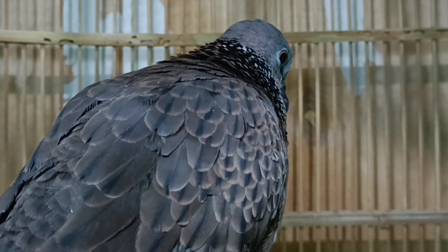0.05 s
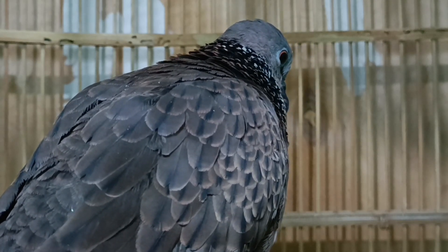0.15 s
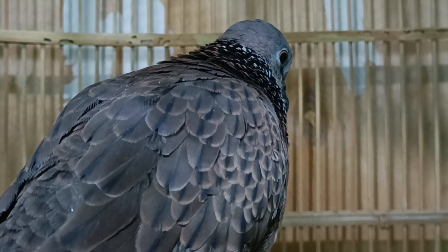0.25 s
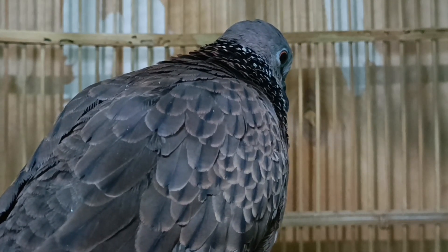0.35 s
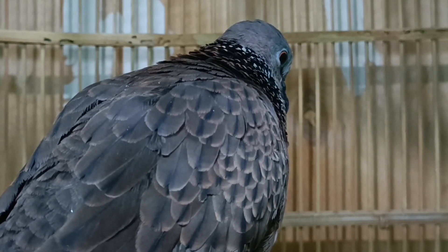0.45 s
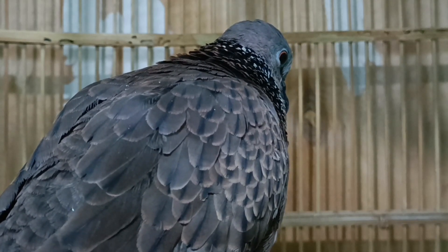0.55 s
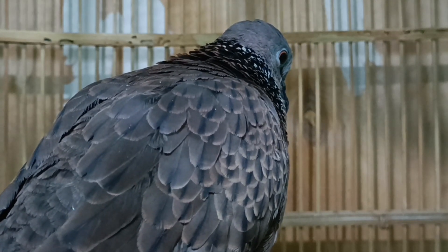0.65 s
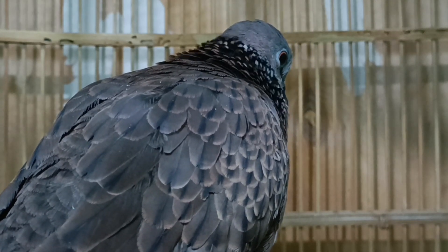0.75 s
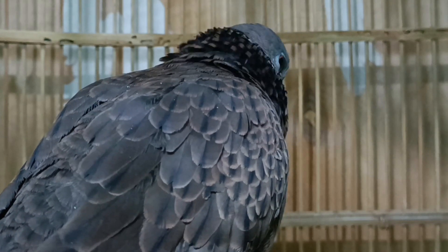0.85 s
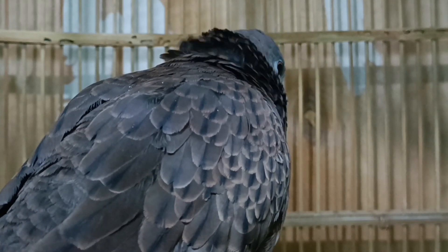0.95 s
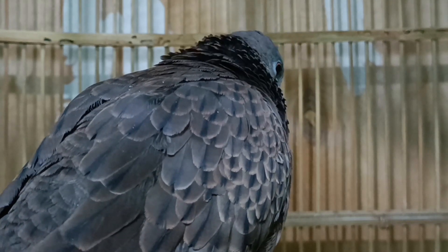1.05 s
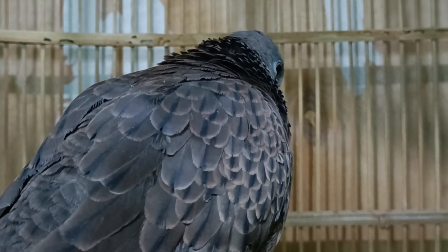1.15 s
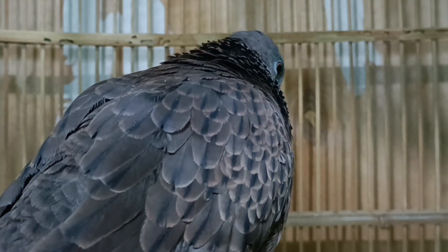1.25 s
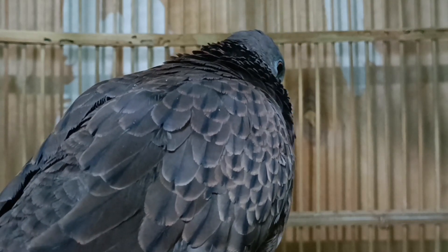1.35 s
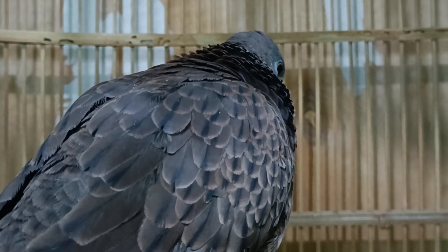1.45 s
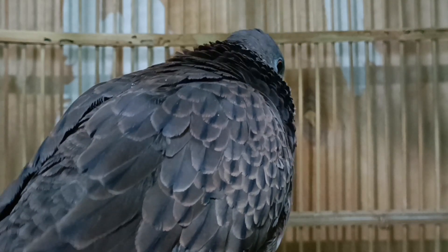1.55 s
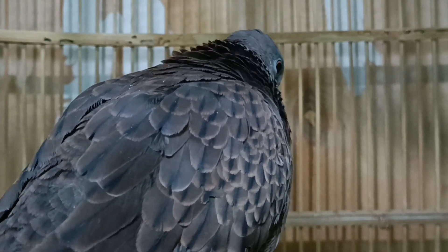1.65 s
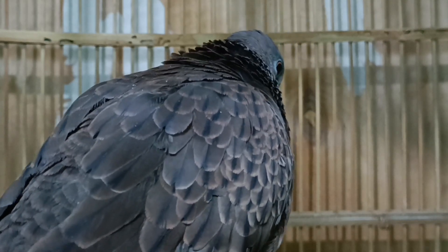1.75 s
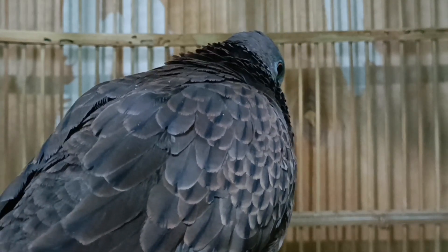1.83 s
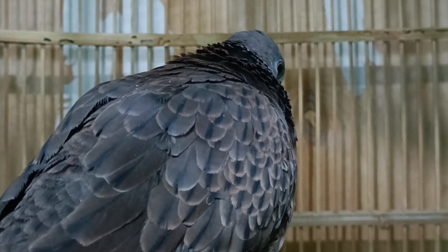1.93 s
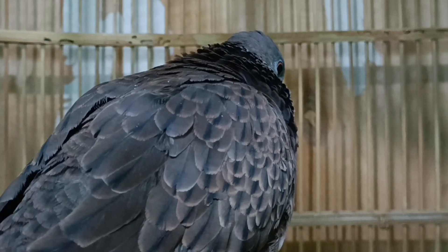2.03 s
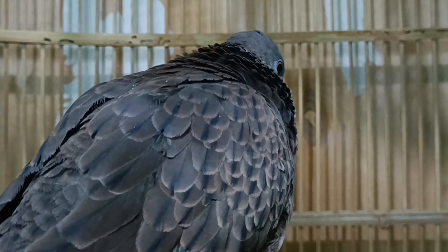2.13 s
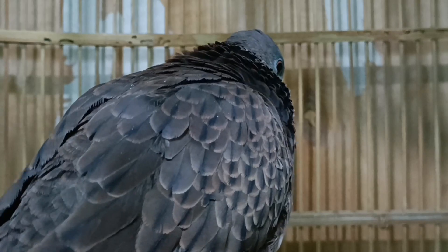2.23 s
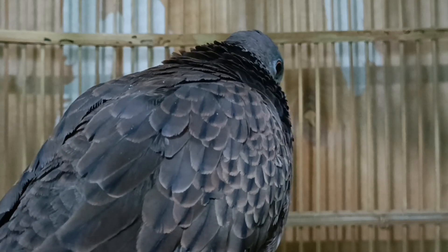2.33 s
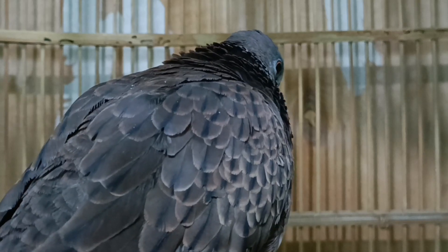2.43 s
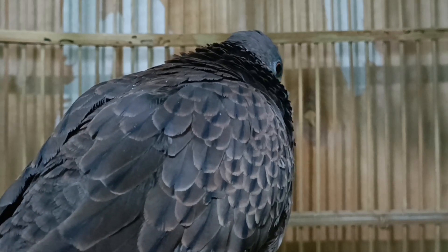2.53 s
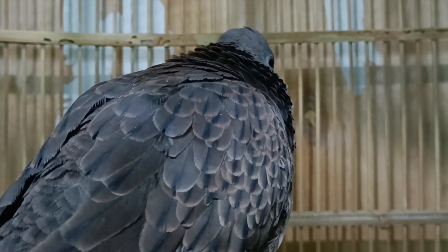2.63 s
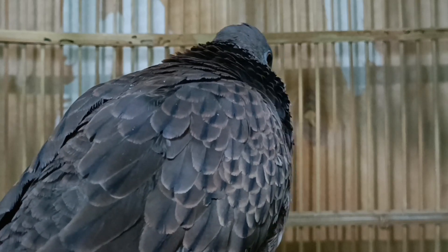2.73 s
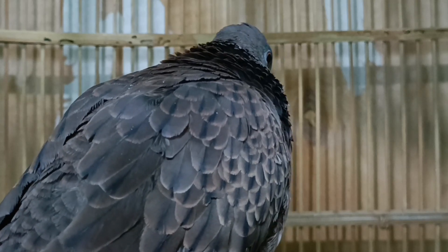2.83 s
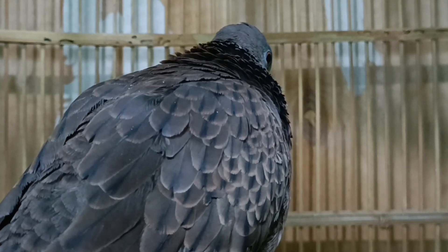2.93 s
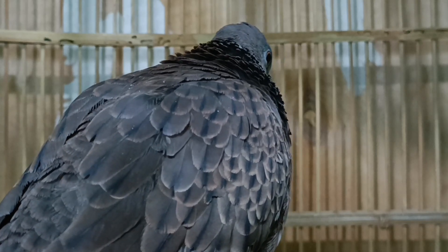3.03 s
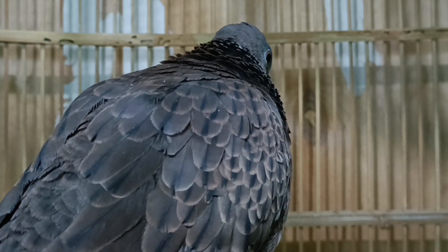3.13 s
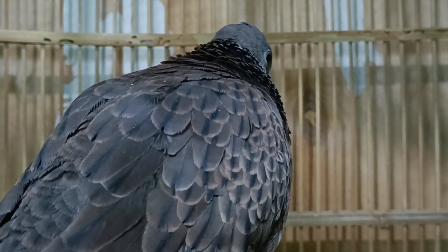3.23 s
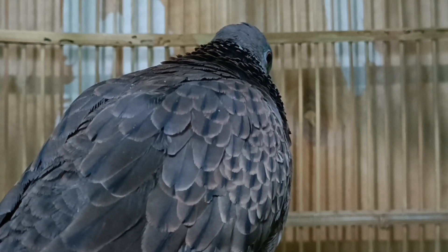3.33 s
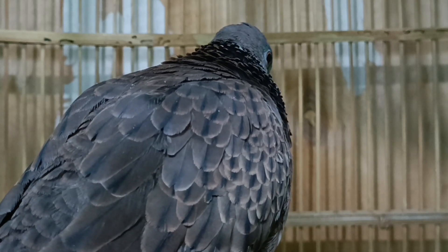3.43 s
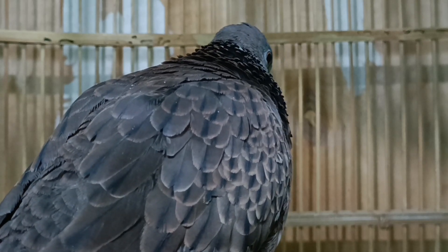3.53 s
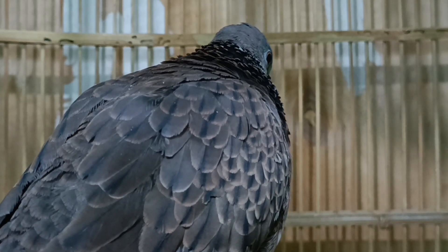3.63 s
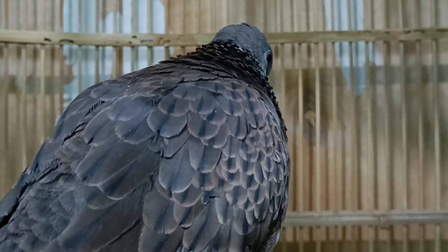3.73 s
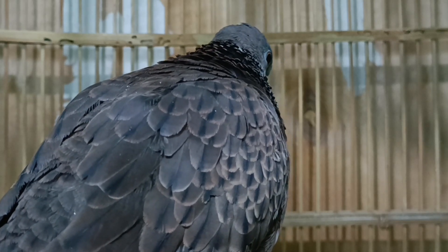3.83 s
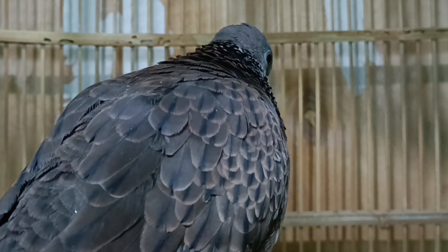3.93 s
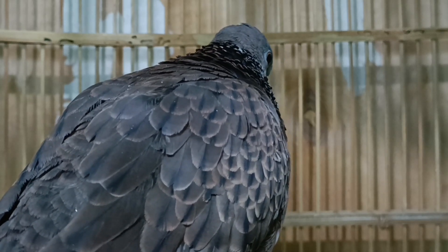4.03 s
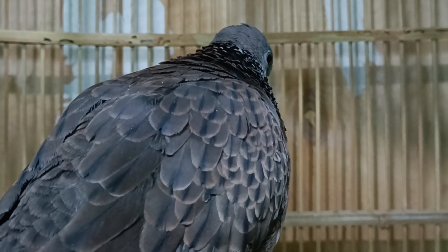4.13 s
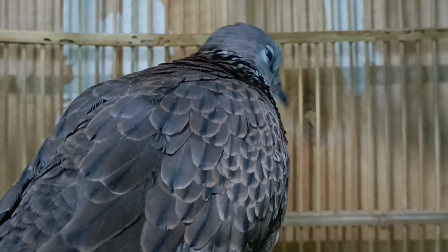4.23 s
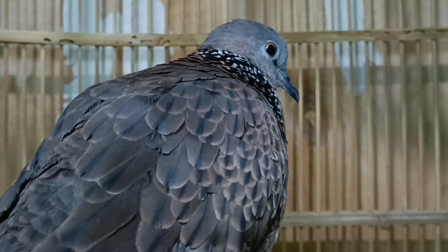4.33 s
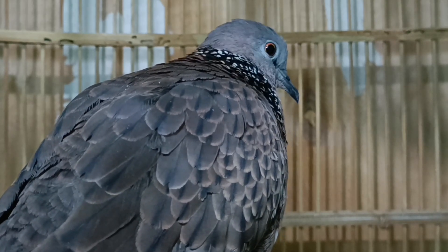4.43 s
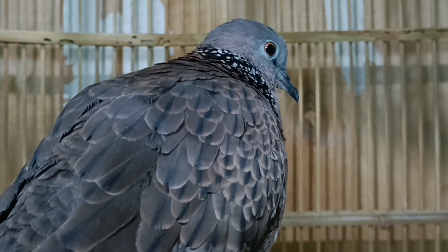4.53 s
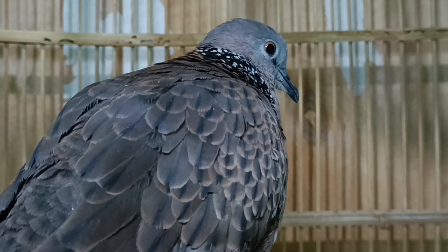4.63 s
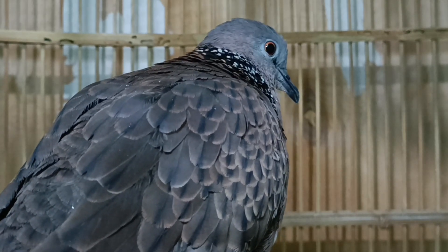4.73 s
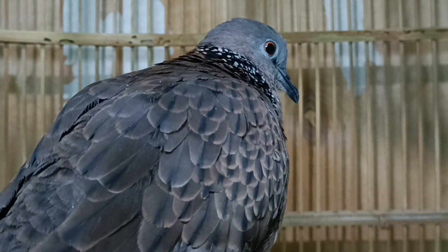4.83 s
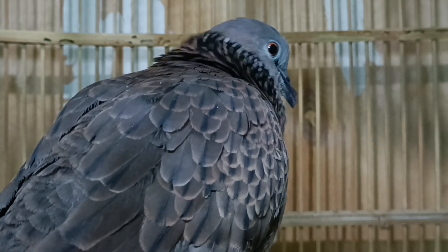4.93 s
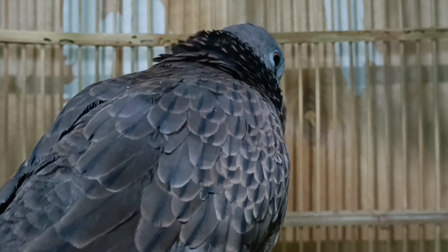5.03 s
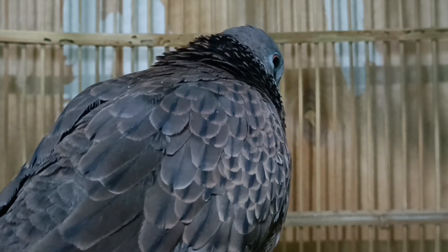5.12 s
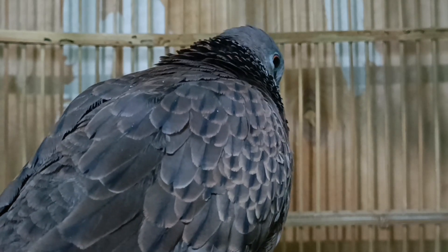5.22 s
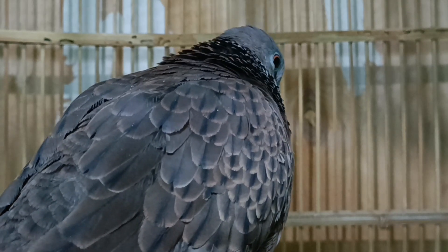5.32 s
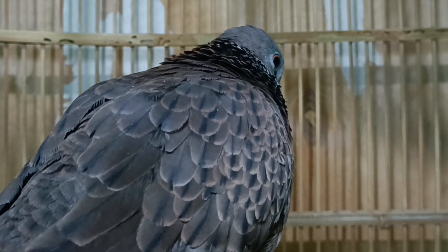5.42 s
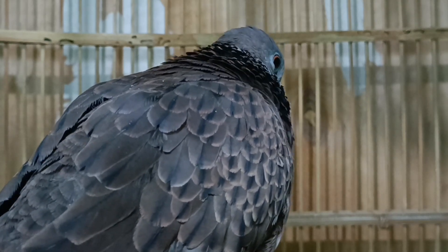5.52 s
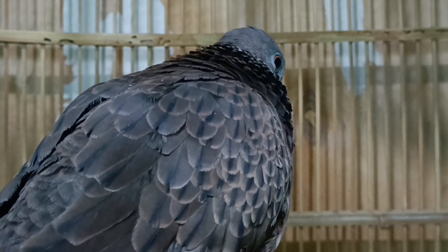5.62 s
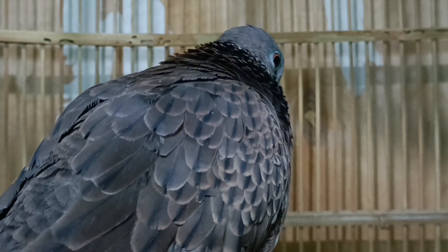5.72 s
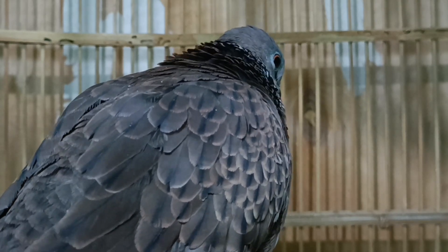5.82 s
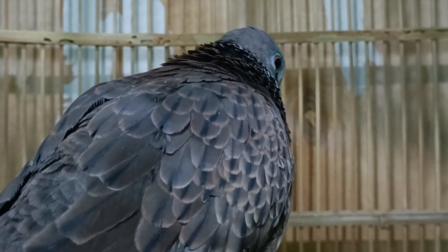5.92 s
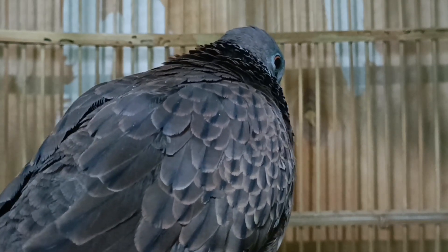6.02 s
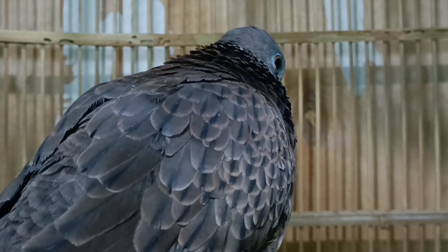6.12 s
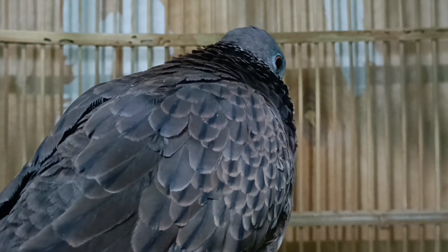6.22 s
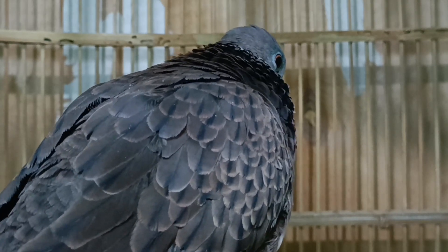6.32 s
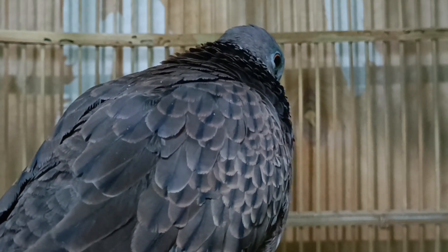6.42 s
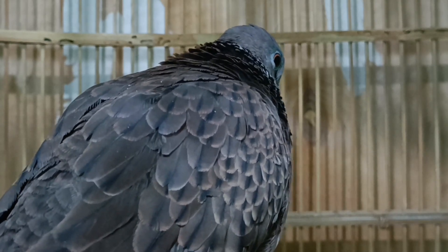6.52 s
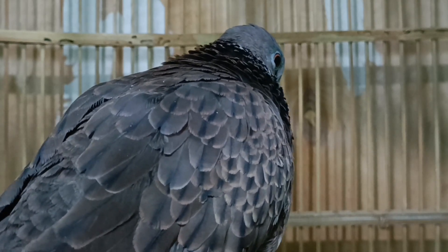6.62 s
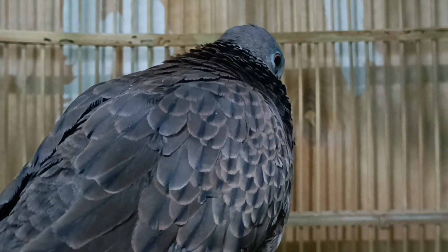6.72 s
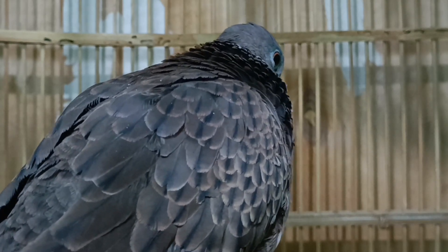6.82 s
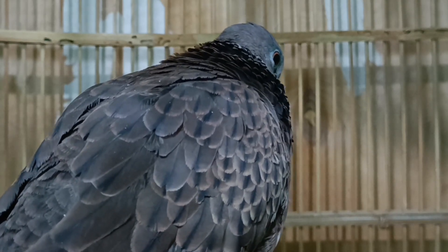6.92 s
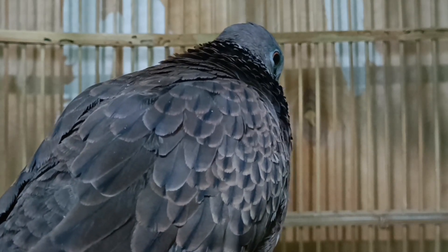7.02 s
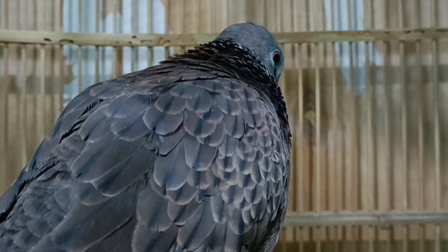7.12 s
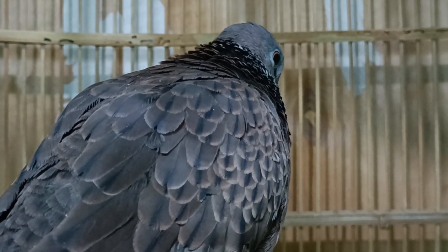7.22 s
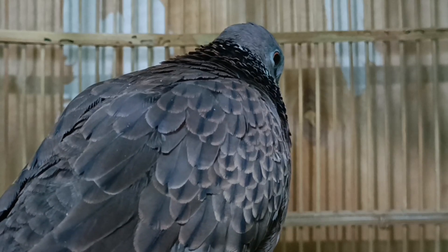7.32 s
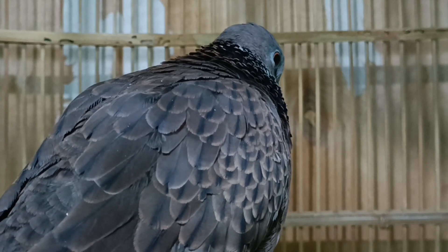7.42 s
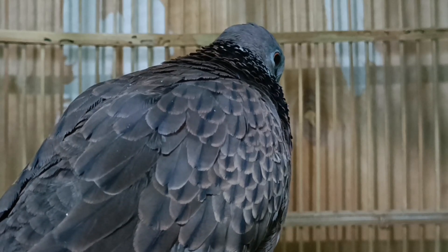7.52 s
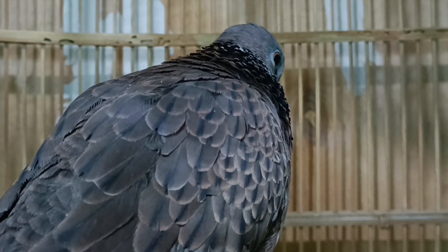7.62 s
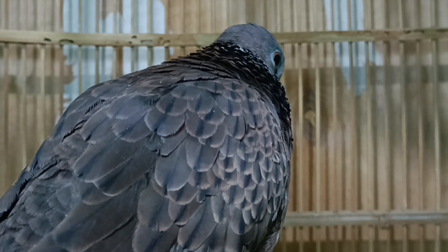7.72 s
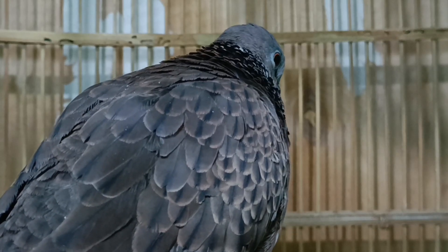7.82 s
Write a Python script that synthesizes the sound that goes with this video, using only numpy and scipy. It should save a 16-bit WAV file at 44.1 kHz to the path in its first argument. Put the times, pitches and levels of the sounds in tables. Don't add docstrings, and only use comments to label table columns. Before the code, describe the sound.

A caged dove close by coos two four-note phrases, each with a rolled trill, over a faint throbbing motor hum; another dove answers far off.

```python
import sys
import numpy as np
from scipy import signal
from scipy.fft import rfft, irfft
from scipy.io import wavfile
from scipy.ndimage import uniform_filter1d

SR = 44100
rng = np.random.default_rng(int(sys.argv[2]) if len(sys.argv) > 2 else 0)


def to_wav(s):
    ch = np.atleast_2d(s).T
    pcm = np.round(np.clip(ch, -1, 1) * 32767)
    wavfile.write(sys.argv[1], SR, pcm.astype(np.int16))


def gain_from_decibels(decibels):
    exponent = np.asarray(decibels, float) / 20
    return 10 ** exponent


N = 346626


def evened(x):
    return x / np.sqrt(np.mean(x ** 2) + 1e-20)


def read(points, hz):
    f, value = np.transpose(points)
    return np.interp(np.log(hz + 1), np.log(f + 1), value)


def add(mix, s, sound):
    part = mix[round(s * SR):][:len(sound)]
    part += sound[:len(part)]


def drift(hz, size=N):
    width = int(SR / hz)
    return evened(uniform_filter1d(uniform_filter1d(rng.standard_normal(size), width), width))


def note_drift(hz, size):
    return drift(hz, size=SR // 2)[:size]


def band(x, lo_hz, hi_hz):
    return signal.sosfilt(signal.butter(2, [lo_hz, hi_hz], "band", fs=SR, output="sos"), x)


def notes():
    # t from note start/s, pitch f/Hz, effort/dB
    chuck = [(0, 546.7, -23), (.012, 589, -18.5), (.026, 620, -16.5), (0.035, 723, -20.5),
             (.048, 762, -13.5)]
    held = [(0, 540, -21.5), (.029, 625.3, -10), (.039, 718, -21), (0.053, 738.7, -11.5),
            (0.101, 783.4, -15.5), (.2, 746.8, -14), (.248, 705, -9.5), (.264, 582.6, -15.5),
            (.282, 463.7, -49.5)]
    rolled = [(0, 710.6, -25), (.014, 752, -13.5), (.042, 780, -20), (0.065, 786.3, -20),
              (.2, 758.3, -19.5), (.25, 742.7, -17.5), (.31, 655, -13.5), (0.382, 536, -24.5),
              (0.468, 444, -45)]
    closing = [(0, 453, -38.5), (0.036, 653, -9), (.05, 724.5, -25), (0.062, 720, -27), (.083, 737.6, -22),
               (.135, 686.6, -11), (.186, 575, -19), (0.234, 478, -31), (.265, 461, -44)]
    # start t/s, stretch/1, pitch ratio/1, effort/dB, overtones/dB
    sung = [
        [(1.064, 0.83, 0.95, -0.65, 2.4), (1.392, 0.99, 1.003, -4.5, 1.6), (1.9, 1.001, 0.99, -2.03, -1.2),
         (2.598, 0.99, 0.99, -2.5, 0.7)],
        [(5.164, 0.43, 0.91, -7, -8), (5.505, 1.003, 1.002, -4.45, 0.5), (6.012, .99, 1, -1.8, -1.5),
         (6.706, 1.005, 0.99, -2.5, 1)],
    ]
    tight_hz, full_db = 760, -15
    out = []
    for phrase in sung:
        for shape, (start, stretch, ratio, db, bright_db) in zip((chuck, held, rolled, closing), phrase):
            s, hz, effort_db = np.transpose(shape)
            over_db = -11.5 + bright_db + 0.0326 * (hz - tight_hz) + .3 * (effort_db - full_db)
            out.append(np.transpose([start + stretch * s, ratio * hz, effort_db + db, over_db]))
    return out


def coo(rows):
    # f/Hz, level/dB
    windpipe = [(900, -26.5), (1250, -33.5), (1550, -52.5), (1820, -56.5), (2250, -41), (2550, -53.5),
                (2850, -41.5), (3350, -64), (3800, -56.5), (5100, -71), (6100, -63), (7000, -75),
                (10500, -72), (12000, -88.5)]
    # f/Hz, level/dB
    neck_sac = [(430, 8.5), (540, -8.5), (610, 6), (690, -2.5), (745, 4.5), (800, 5)]
    slack_hz, top_hz = 560, 790
    bloom_s, bloom_db = 0.035, -16.5
    s, *columns = np.transpose(rows)
    t = np.arange(s[0], s[-1], 1 / SR)
    size, since = len(t), t - s[0]
    hz, tone_db, over_db = (np.interp(t, s, c) for c in columns)
    slack, gain = flutter(t)
    held_hz = uniform_filter1d(hz, 150) * (1 + .002 * note_drift(60, size))
    hz = held_hz + slack * (slack_hz - held_hz)
    turn = 2 * np.pi * np.cumsum(hz) / SR

    dull_db = 6.0 * np.clip(1 - hz / top_hz, 0, 1) + 16 * slack
    late_db = bloom_db * np.clip(1 - since / bloom_s, 0, 1) ** .5
    overtones = np.zeros(size)
    for k in range(2, 17):
        k_db = read(windpipe, k * hz) - max(k - 2.5, 0) * dull_db
        k_db = k_db - 5 * (k == 4)
        k_db = k_db + (k > 2) * late_db + 4.1 * note_drift(35, size)
        overtones += gain_from_decibels(k_db) * np.cos(k * turn)

    rolling = uniform_filter1d(uniform_filter1d(slack, 3000), 3000)
    rolling = rolling * 4 * np.clip(since / .16, 0, 1) + .1
    air = evened(band(rng.standard_normal(size), 5850, 6300)) * gain_from_decibels(-57) * rolling
    air += evened(band(rng.standard_normal(size), 1100, 3600)) * gain_from_decibels(-51) * slack

    tone = gain_from_decibels(tone_db + read(neck_sac, hz)) * np.cos(turn) * gain
    tone = band(band(tone, 400, 1200), 380, 1200)
    edge = np.clip(np.minimum(since, s[-1] - t) / 0.0018, 0, 1)
    return s[0], np.sqrt(2) * (tone + gain_from_decibels(over_db) * (overtones + air) * gain) * edge


def flutter(t):
    # start t/s, length/s, pulses/1, quickening/1, slack warm-up/s
    rolls = [
        (1.9, .213, 10, .16, .052),
        (6.013, .201, 9, .12, .03),
    ]
    jump, glide, rise, fall = .56, .28, .12, .15
    shut_db, depth, warm_slack, uneven = -10, .68, .55, .1
    slack, gain, wander = np.zeros(len(t)), np.ones(len(t)), note_drift(21, len(t))
    for s, length, pulses, quickening, warm_s in rolls:
        on = (t >= s) & (t < s + length)
        x = (t[on] - s) / length
        count = round(pulses) * (x - quickening * x * (1 - x))
        u = (count + uneven * wander[on] * np.sin(np.pi * x)) % 1
        warm = x * length < warm_s
        flip = np.clip((jump + uneven * wander[::-1][on] - u) / glide, 0, 1)
        slack[on] = np.where(warm, warm_slack + .25 * (1 - u), depth * flip)
        opening = np.minimum(u / rise, (1 - u) / fall) / (1 + 2 * warm)
        gain[on] = gain_from_decibels(shut_db) + np.clip(opening, 0, 1)
    return uniform_filter1d(slack, 120), uniform_filter1d(gain, 150)


def clicks():
    # t/s, peak level/dB
    snaps = [(1.034, -48), (1.0879, -42), (1.4202, -43), (1.4431, -42), (1.4514, -42), (1.4644, -46),
             (1.9365, -50), (1.9594, -45), (2.1146, -41), (5.1322, -51), (5.5243, -46), (5.5333, -41),
             (5.5513, -41), (6.0477, -54), (6.0731, -43), (6.2474, -49)]
    # f/Hz, level/dB
    snap_tone = [(300, -14), (1000, 0), (3500, -5), (7500, -13), (10000, -21), (16000, -28)]
    # t/s, length/s, centre f/Hz, level/dB
    puffs = [
        (1.065, .05, 90, -52),
        (1.352, .045, 700, -43),
        (1.415, .05, 80, -50),
        (5.148, .02, 720, -47),
        (5.18, .075, 700, -37),
        (5.472, .04, 730, -43),
        (5.515, .05, 70, -50),
    ]
    out, t = np.zeros(N), np.arange(400) / SR
    colour = gain_from_decibels(read(snap_tone, np.fft.rfftfreq(400, 1 / SR)))
    for s, db in snaps:
        snap = irfft(rfft(rng.standard_normal(400)) * colour)
        add(out, s, gain_from_decibels(db - 4.5 - 60 * t / .012) * evened(snap))
    for s, length, hz, db in puffs:
        puff = band(rng.standard_normal(int(length * SR)), .75 * hz, 1.15 * hz)
        puff = band(puff, .7 * hz, 1.2 * hz)
        add(out, s, gain_from_decibels(db - 5.0) * evened(puff) * signal.windows.tukey(len(puff), .4))
    return out


def near_dove():
    # delay t/s, left level/dB, right level/dB
    echoes = [
        (.0006, -8, -16),
        (.0011, -16, -8),
        (.004, -10, -20),
        (.009, -20, -10),
        (.016, -18, -20),
        (.024, -21, -18),
    ]
    # f/Hz, left-right level/dB
    lean = [(300, -5), (600, 1.15), (760, 4), (1300, 1), (2400, 3), (4400, -4.5), (8000, -5)]
    # f/Hz, lead/rad
    head_start = [(500, 0.23), (900, 0.66), (1500, 1.1), (2250, 0.27), (3000, 0.93), (4400, 1.6),
                  (7000, .1)]
    dove = clicks()
    for rows in notes():
        add(dove, *coo(rows))
    path = gain_from_decibels(-10.5) * tail()
    path[:, 0] += 1
    for s, *db in echoes:
        path[:, round(s * SR)] += gain_from_decibels(db)
    size = N + SR
    hz, side = np.fft.rfftfreq(size, 1 / SR), np.array([[.5], [-.5]])
    lean_db = read(lean, hz) * side
    lead = np.exp(1j * read(head_start, hz) * side)
    heard = rfft(dove, size) * rfft(path, size) * gain_from_decibels(8.0 + lean_db) * lead
    return irfft(heard, size)[:, :N]


def tail(start=.03, stretch=0.6):
    # f/Hz, t/s (before stretch)
    dying = [(300, 0.067), (750, 0.89), (1500, 0.67), (4000, 0.33), (12000, .1)]
    spacing = 20
    taps = np.zeros((2, SR))
    slots = np.arange(0, SR - spacing, spacing)
    at = slots + rng.integers(0, spacing, (2, len(slots)))
    np.put_along_axis(taps, at, rng.choice([-1., 1.], at.shape), 1)
    taps *= np.clip(np.arange(SR) / SR / start, 0, 1) ** 2
    hz, t, z = signal.stft(taps, SR, nperseg=256)
    shaped = z * gain_from_decibels(-60 * t / (stretch * read(dying, hz)[:, None]))
    out = signal.istft(shaped, SR, nperseg=256)[1]
    kept = np.mean(abs(shaped[:, 4]) ** 2) / np.mean(abs(z[:, 4]) ** 2)
    return out / np.sqrt(kept * SR / spacing)


def far_dove():
    # start t/s, length/s, top pitch f/Hz, level/dB, trill depth/0-1
    calls = [
        (3.561, 0.11, 656, -57, .1),
        (3.817, 0.165, 784, -39.5, 0.33),
        (4.11, .45, 817.7, -39.5, 0.59),
        (7.311, 0.12, 775, -41.5, 0.33),
        (7.606, .4, 824, -41.5, 0.84),
    ]
    trill_hz, dip, quaver, crest_s = 45, 0.2, 0.025, .08
    out = np.zeros(N)
    for s, length, top_hz, db, depth in calls:
        t = np.arange(0, length, 1 / SR)
        bend = np.where(t < crest_s, .1 * (1 - t / crest_s) ** 2, 2.0 * (t - crest_s) ** 2)
        smoothing = np.clip(1.6 - 2 * t / length, 0, 1)
        lag = np.clip(depth, 0, 1) * (1 - t * trill_hz % 1) * smoothing
        hz = top_hz * (1 - bend - dip * lag + quaver * drift(39.5, size=SR)[:len(t)])
        tone = np.cos(2 * np.pi * np.cumsum(hz) / SR) * uniform_filter1d(1 - lag, 100)
        add(out, s, gain_from_decibels(db - 18 * t) * tone * signal.windows.tukey(len(t), .3))
    return signal.fftconvolve(out[None], tail(start=0.0074, stretch=0.76), axes=1)[:, :N]


def motor():
    # f/Hz, rms level/dB, throb depth/0-1, throb phase/rad, left-right level/dB, left lead/rad
    hum = [
        (100, -45.5, .25, 3, -2.5, 0.19),
        (200.5, -52, 0.1, 0, -4.5, -0.16),
        (301.3, -64.5, 1, -1.37, 1.5, -0.46),
        (400, -62, 0.91, -0.87, -0.05, -0.038),
    ]
    # t/s, level/dB
    hum_swell = [(0, -4.5), (1, 0.5), (2.5, -1.5), (3.5, -4), (4.3, 0), (5.3, 2.5), (6.5, 3), (7.85, 5.5)]
    # f/Hz, rms level/dB
    rotor = [(112, -71.5), (146, -68.5), (150.4, -69.5), (161, -66), (193.6, -65.5), (293, -67.5),
             (2002, -83)]
    throb_hz = 3.865
    t, out = np.arange(N) / SR, np.zeros((2, N))
    side = np.array([[.5], [-.5]])
    for k, (hz, db, depth, phase, pan_db, lead) in enumerate(hum):
        swell_db = (k == 1) * np.interp(t, *np.transpose(hum_swell)) + .9 * drift(8)
        throb = 1 + depth * np.cos(2 * np.pi * throb_hz * t + phase)
        tone = np.sqrt(2) * np.cos(2 * np.pi * hz * t + side * lead + k)
        out += gain_from_decibels(db + swell_db + side * pan_db) * throb * tone
    for hz, db in rotor:
        wavering_hz = hz + (1.2 + hz / 500) * drift(3.7)
        tone = np.sqrt(2) * np.cos(2 * np.pi * np.cumsum(wavering_hz) / SR)
        out += gain_from_decibels(db + 3.5 * drift(1.3)) * tone
    return out


def wash():
    # f/Hz, level/dB per Hz
    air_colour = [(15, -78.5), (25, -32), (43, -22.5), (72, -22.5), (104, -9.5), (145, -10.5), (208, -11),
                  (249, -19.5), (407, -18), (451, -20), (906, -33), (1970, -30), (5120, -42), (12000, -51),
                  (15600, -85.5), (22000, -120)]
    # f/Hz, likeness/-1 to 1
    likeness = [(60, 1), (240, 0.59), (950, 0.34), (3770, 0.02), (15000, -1)]
    frames, hz = N // 256 + 5, np.fft.rfftfreq(1024, 1 / SR)
    a, b, c, d, patches = rng.standard_normal((frames, 513, 5)).T
    patches = evened(uniform_filter1d(uniform_filter1d(patches, 12, 0), 14, 1))
    same = np.clip(read(likeness, hz), -1, 1)[:, None]
    left = a + 1j * b
    right = same * left + np.sqrt(1 - same ** 2) * (c + 1j * d)
    z = np.array([left, right]) * gain_from_decibels(read(air_colour, hz)[:, None] + .8 * patches)
    return gain_from_decibels(-51.5) * evened(signal.istft(z, nperseg=1024, noverlap=768)[1][:, :N])


def scene():
    return near_dove() + far_dove() + motor() + wash()


def low_pass(x):
    return signal.sosfilt(signal.butter(12, 16690, fs=SR, output="sos"), x)


def record(dry):
    wet = signal.sosfilt(signal.butter(2, 45, "high", fs=SR, output="sos"), dry)
    wet = wet + gain_from_decibels(-70.5) * band(rng.standard_normal(dry.shape), 9700, 20000)
    power_db = 10 * np.log10(abs(uniform_filter1d((wet ** 2).mean(0), 1500)) + 1e-12)
    fall = np.arange(N) * 5.5 / SR
    peak_db = np.maximum.accumulate(np.maximum(power_db + fall, -15)) - fall
    over_db = np.maximum(peak_db + 23, 0)
    ducked = wet / gain_from_decibels(.4 * uniform_filter1d(over_db, 2000))
    ducked = signal.sosfilt(signal.cheby2(20, 40, 15750, fs=SR, output="sos"), ducked)
    return low_pass(ducked)


dry = scene()
out = record(dry)
to_wav(out)
```